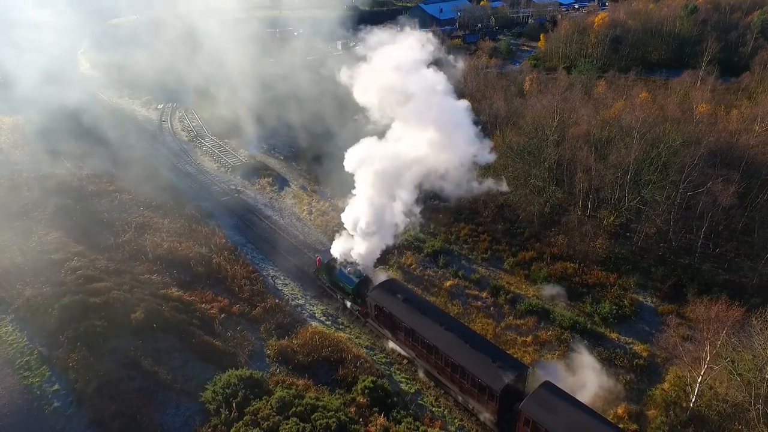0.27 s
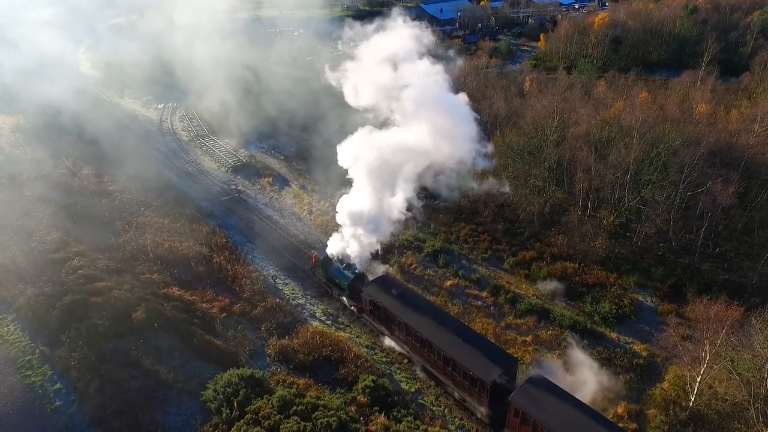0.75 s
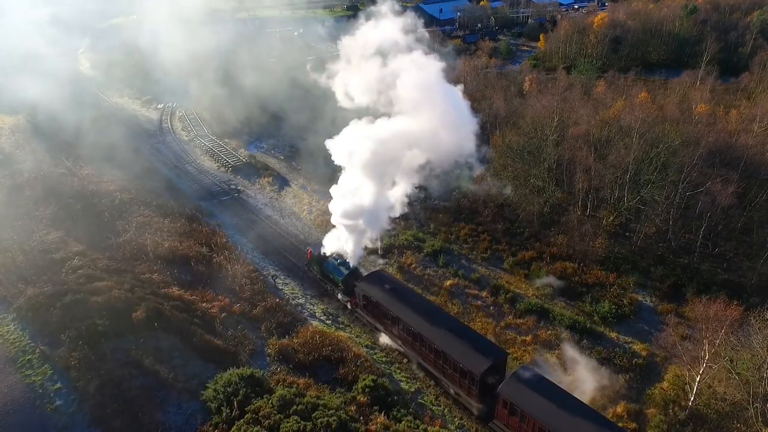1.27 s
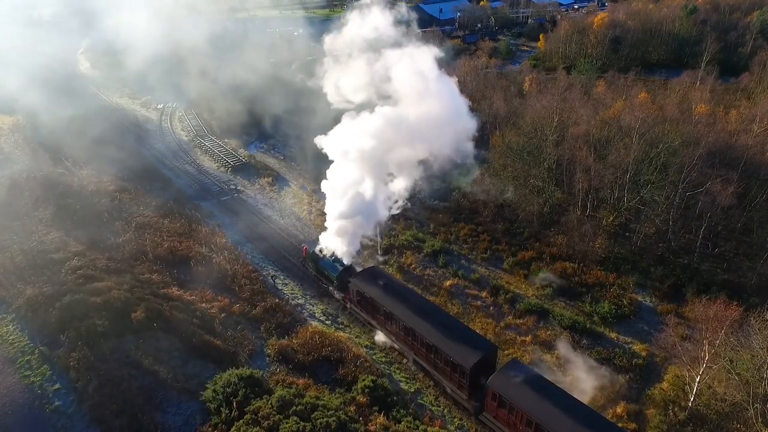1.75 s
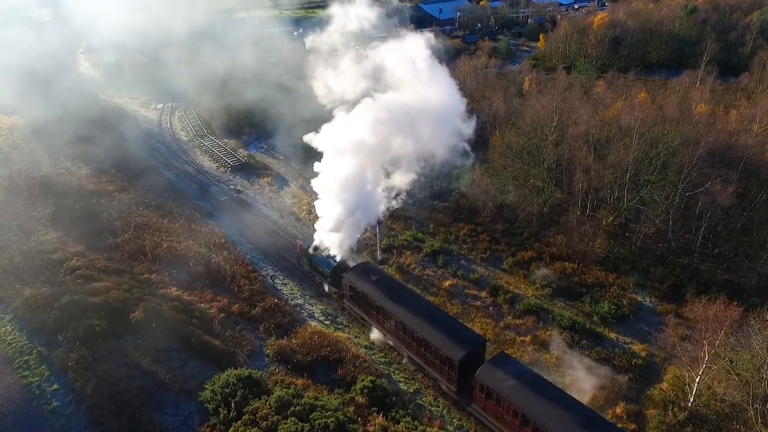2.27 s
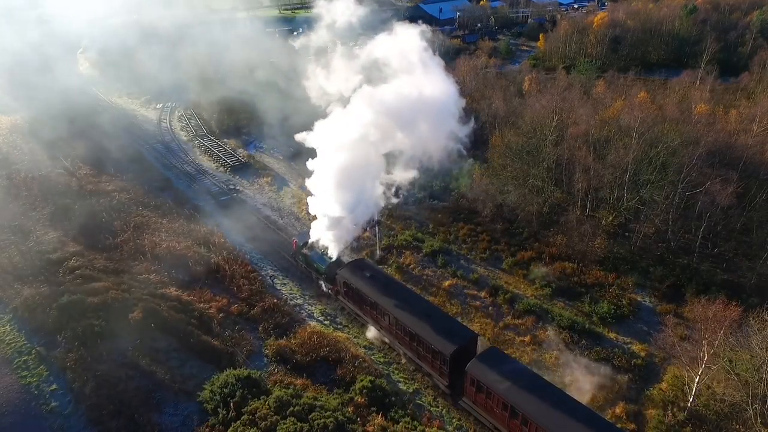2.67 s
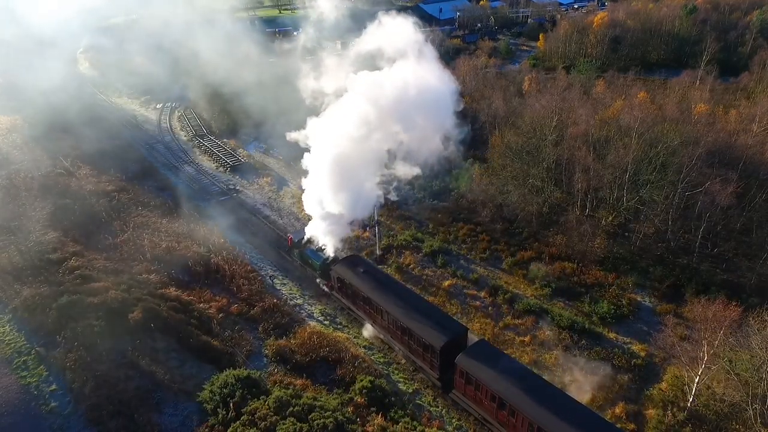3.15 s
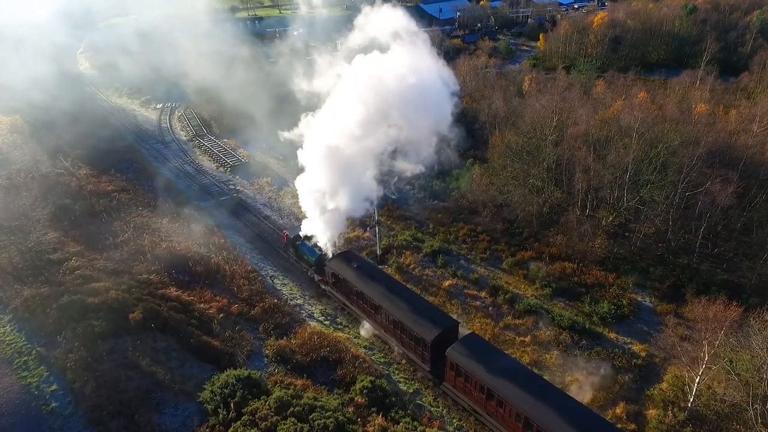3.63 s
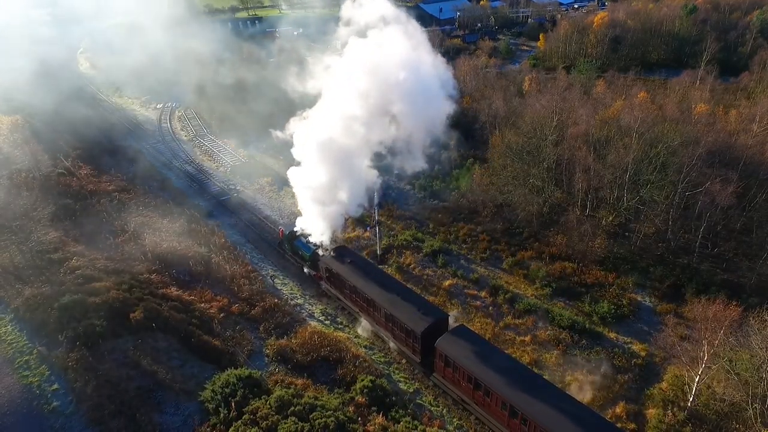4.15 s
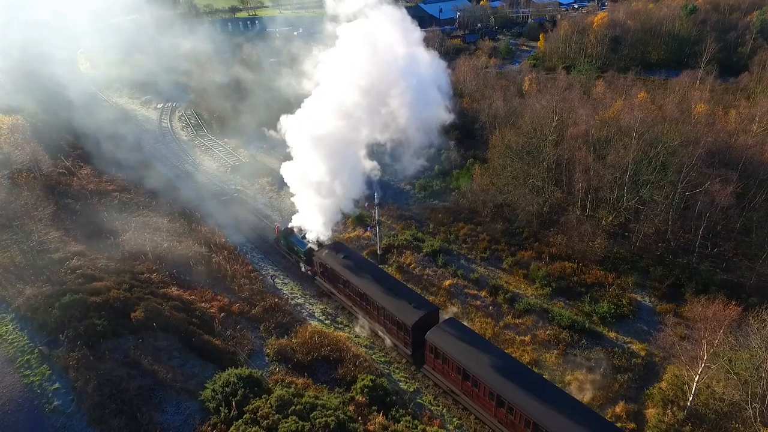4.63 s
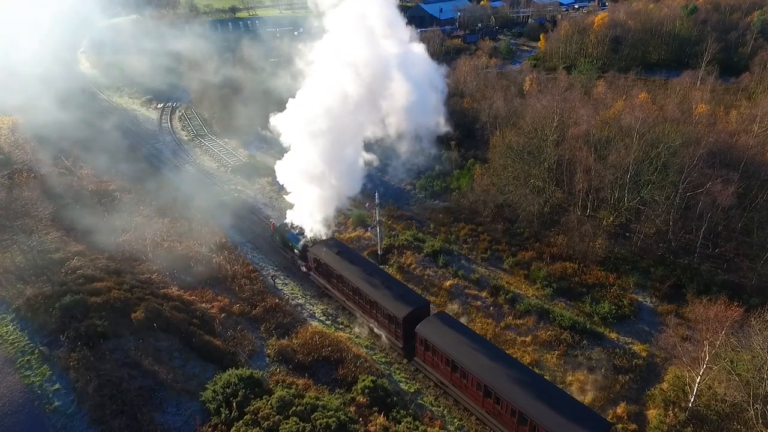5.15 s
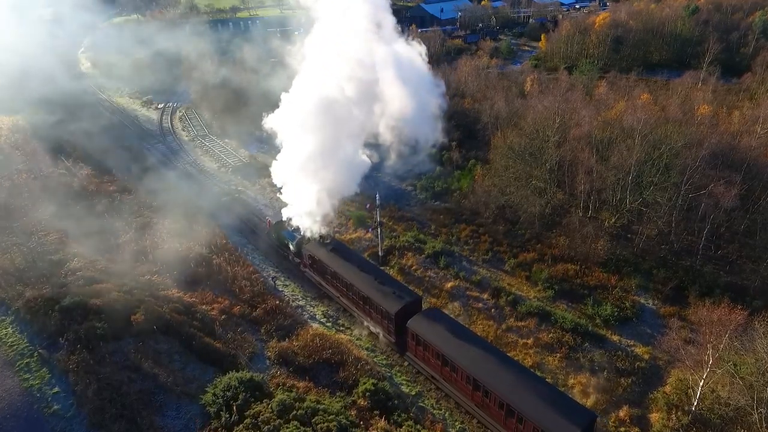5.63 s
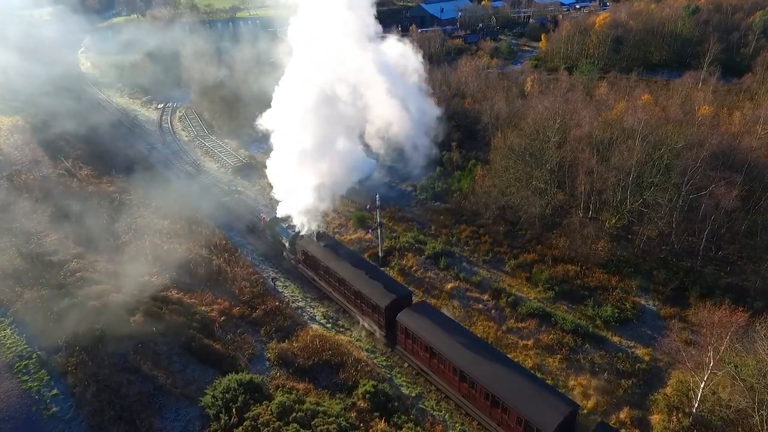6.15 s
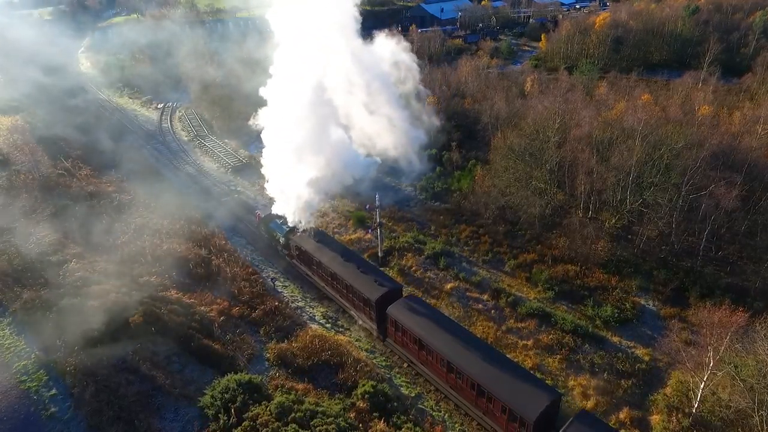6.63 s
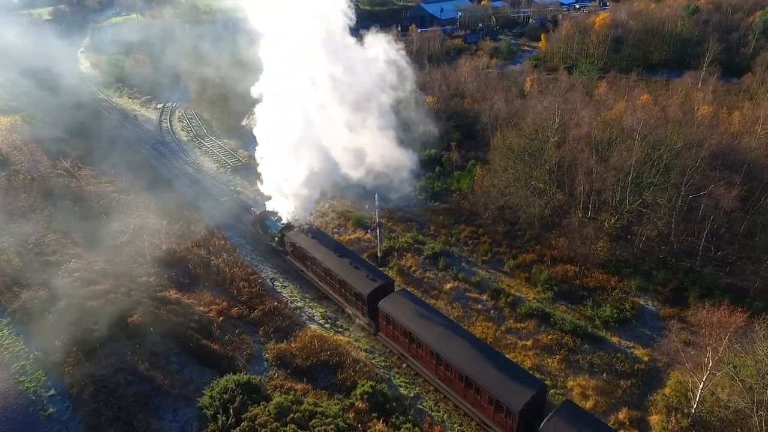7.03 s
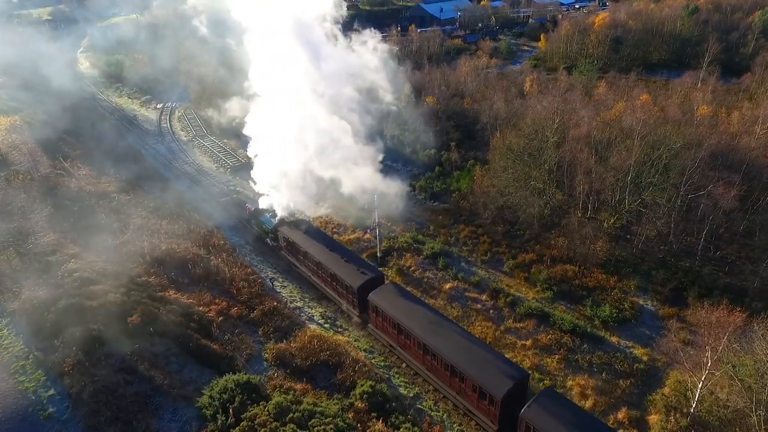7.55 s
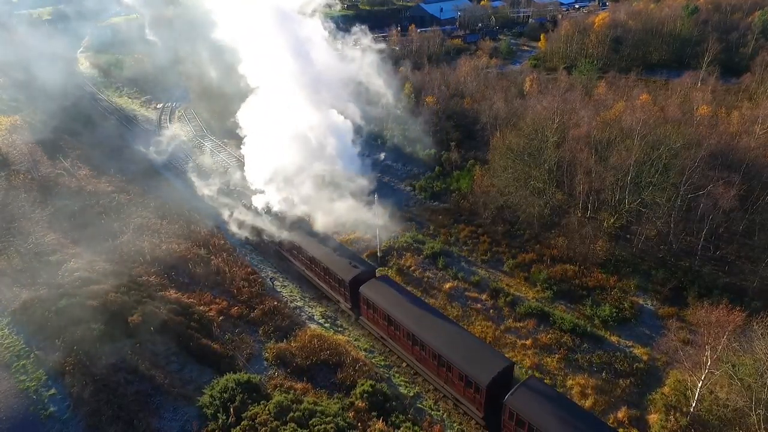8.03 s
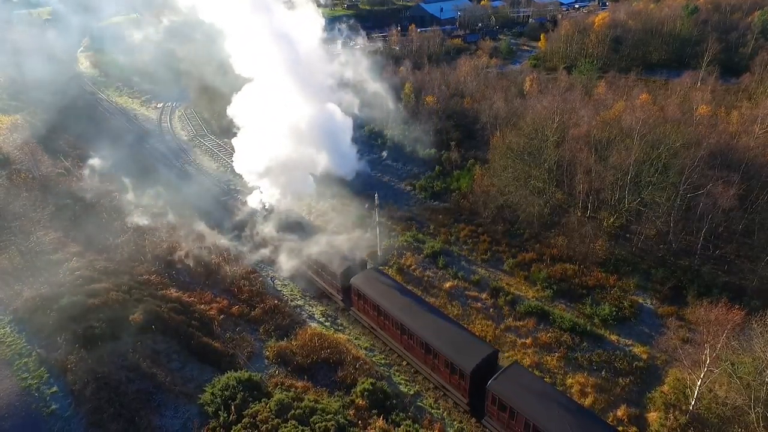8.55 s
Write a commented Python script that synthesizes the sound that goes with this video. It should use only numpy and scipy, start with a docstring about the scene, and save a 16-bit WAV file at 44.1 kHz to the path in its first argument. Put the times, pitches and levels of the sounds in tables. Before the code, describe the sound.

A steam locomotive chuffs at a distance, heavy hollow exhaust beats quickening then softening over a constant bright steam hiss and low rumble.

```python
"""A steam locomotive works a train across open country, heard from some way off.
Each exhaust beat is a burst of turbulence: two chimney tones, a roar with a bark in it and a soft spray.
A low sine thump, falling in pitch, follows most beats; dull knocks of band-limited noise fall around them.
Leaking steam is bright noise with two flickering whistles, and low noise rumbles from the wheels.
Faint steady noise has opposite polarity at the two ears, and each blast returns as a short dull wash."""
import sys
import numpy as np
from scipy import signal
from scipy.fft import rfft, irfft
from scipy.io import wavfile
from scipy.ndimage import uniform_filter1d

SR = 44100
rng = np.random.default_rng(int(sys.argv[2]) if len(sys.argv) > 2 else 0)


def transcribe(signal):
    """Save signal, clipped to [-1, 1], as a 16-bit WAV file at the path in sys.argv[1]."""
    frames = np.atleast_2d(signal).T
    limited = np.clip(frames, -1, 1)
    pcm = np.round(limited * 32767).astype(np.int16)
    wavfile.write(sys.argv[1], SR, pcm)


N = 387638


def from_db(db):
    """Gain of a level in dB."""
    return 10 ** (np.asarray(db) / 20)


def rms_one(x):
    """Scale to rms 1."""
    return x / np.sqrt(np.mean(x ** 2) + 1e-20)


def in_time(rows):
    """Columns of a curve table (time first), interpolated to one value per sample."""
    s, *columns = np.transpose(rows)
    t = np.arange(N) / SR
    return [np.interp(t, s, column) for column in columns]


def coloured(spectrum):
    """Noise with the given spectrum, rms 1; levels run straight over log frequency."""
    hz, db = np.transpose(spectrum)
    grid = np.maximum(np.fft.rfftfreq(N, 1 / SR), 1)
    grid_db = np.interp(np.log(grid), np.log(hz), db)
    white = rng.standard_normal(N)
    return rms_one(irfft(rfft(white) * from_db(grid_db), N))


def passed(x, edge, kind):
    """One reach of the spectrum, filtered both ways so that it is not delayed."""
    sos = signal.butter(2, edge, kind, fs=SR, output="sos")
    return signal.sosfiltfilt(sos, x)


def evened(x, over_s):
    """Steady the level over the given time, so that the envelope sets the loudness."""
    size = max(int(over_s * SR), 1)
    power = uniform_filter1d(uniform_filter1d(x ** 2, size=size), size=size)
    return rms_one(x / np.sqrt(power + 1e-3))


def patchy(x, depth_db, span_s, span_hz, swells=()):
    """Patches of the spectrum swell and sink at random, as moving air and drifting steam make them."""
    swell_rise = .03  # octaves per s
    hz, s, z = signal.stft(x, SR, nperseg=1024)
    field = rng.standard_normal(z.shape)
    # smooth the random field twice along frequency, then twice along time
    for axis, step, span in ((0, hz[1], span_hz), (1, s[1] - s[0], span_s)):
        for _ in range(2):
            field = uniform_filter1d(field, size=max(int(span / step), 1), axis=axis, mode="wrap")
    gain_db = depth_db * rms_one(field)
    for at, half, centre, width, db in swells:
        track = centre * 2 ** (swell_rise * (s - at))
        in_span = ((s - at) / half) ** 2
        in_band = ((hz[:, None] - track) / width) ** 2
        gain_db += db * np.exp(-.5 * in_span - .5 * in_band)
    return signal.istft(z * from_db(gain_db), SR, nperseg=1024)[1][:N]


def steam():
    """Smooth bright hiss with two flickering whistles; its reaches come and go with the drifting cloud."""
    # leaking steam: t/s, then rms level/dB of low hiss, whistle, lower whistle, middle, treble and top hiss
    leak = [(0, -40, -47, -48, -51, -51.5, -57.5), (1.05, -40, -47.5, -50, -50.5, -54, -57.5),
            (2.1, -39.5, -52, -56, -48, -52, -56.5), (2.5, -40, -42.5, -44.5, -46.5, -53.5, -58.5),
            (3.2, -40, -44, -46, -45.5, -53, -56), (4.5, -42.5, -45, -48.5, -43, -55, -57.5),
            (5.15, -42.5, -48, -51, -46.5, -53, -58), (5.7, -43.5, -42.5, -48, -46.5, -52.5, -57),
            (7.1, -43, -42.5, -45, -48, -50.5, -58.5), (7.65, -41, -43, -48, -47, -52, -60.5),
            (8.3, -41.5, -42, -49, -44.5, -51, -59), (8.79, -39, -44, -48, -46, -53.5, -63)]
    # colour of the escaping steam: f/Hz, relative level per Hz/dB
    hiss_colour = [(530, -6), (900, -2.5), (1160, -0.5), (1340, 6), (1520, 4), (1710, 5), (1910, 2),
                   (2200, 0), (2480, -6.5), (3540, -15), (5190, -29.5), (9310, -31), (15500, -39.5)]
    # stretches of hiss that swell: centre t/s, half length/s, centre f/Hz, half width/Hz, gain/dB
    hiss_swells = [(.2, 0.14, 9300, 300, 4), (2.1, .44, 13600, 500, 6), (2.2, 0.34, 9000, 300, 2.5),
                   (0.31, 1, 3760, 250, 5), (3.14, 0.33, 4800, 250, 8), (3.4, 0.28, 8793, 330, 4),
                   (4.2, 0.46, 7270, 300, 7), (4.4, 0.65, 11000, 400, 6), (4.6, 0.22, 5700, 210, 6),
                   (4.42, 0.38, 8600, 320, 9), (5.0, 0.64, 4820, 250, 9), (7, 0.99, 3310, 210, 6),
                   (7.13, 0.68, 3700, 190, 7.5), (8.23, 0.67, 6050, 230, 9), (3.76, 0.73, 3220, 51, 3.5),
                   (8.7, 0.35, 3630, 110, 5), (3.12, 0.18, 2750, 140, 6)]
    # edges of the whistling band and of the fainter one below: f/Hz
    whistle_edges = [2076, 2284]
    lower_edges = [1646, 1773]
    low_db, whistle_db, lower_db, *upper_db = in_time(leak)

    hiss = patchy(coloured(hiss_colour), depth_db=1.6, span_s=.35, span_hz=170, swells=hiss_swells)
    reaches = ((2450, "low"), ([2450, 4200], "band"), ([4200, 7000], "band"), (7000, "high"))  # Hz
    low, middle, treble, top = (from_db(db) * rms_one(passed(hiss, *reach))
                                for db, reach in zip([low_db, *upper_db], reaches))

    whistle = passed(rng.standard_normal(N), whistle_edges, "band")
    whistle = patchy(whistle, depth_db=1.5, span_s=.06, span_hz=150)
    lower = passed(rng.standard_normal(N), lower_edges, "band")
    lower = patchy(lower, depth_db=3.0, span_s=.1, span_hz=150)
    whistles = from_db(whistle_db) * rms_one(whistle) + from_db(lower_db) * rms_one(lower)
    return low + middle + whistles, treble + top


def wheel_rumble():
    """Low patchy noise of the wheels, louder as the train gathers speed."""
    # colour of the rumble: f/Hz, relative level per Hz/dB
    rumble_colour = [(18, -43), (30, -15), (59, -7.5), (113, -5), (194, -3.5), (361, -5.5), (593, -9),
                     (1100, -16), (1430, -39), (2420, -120)]
    start_db, grows = -41, 0.3367  # dB, dB per s
    level_db = start_db + grows * np.arange(N) / SR
    return from_db(level_db) * patchy(coloured(rumble_colour), depth_db=2.5, span_s=.08, span_hz=294)


def opposed_noise():
    """Faint steady noise with humming bands, in opposite polarity at the two ears."""
    # colour of this noise: f/Hz, relative level per Hz/dB
    opposed_colour = [(24, -49), (40, -21), (166, -11), (407, -13.5), (540, -3.5), (600, -8), (700, -2),
                      (800, -13), (1310, -14), (1500, -22), (1770, -4), (1950, -10), (2200, -12),
                      (4800, -22), (8520, -26.5), (15500, -40.5)]
    level_db = -49
    noise = from_db(level_db) * patchy(coloured(opposed_colour), depth_db=0.5, span_s=0.3, span_hz=300)
    return noise * np.array([[1], [-1]])


def thumps():
    """A soft bell-shaped swell of a low sine that sags in pitch."""
    # thumps: centre t/s, rms level at the centre/dB
    thump_rows = [(.04, -44), (.593, -47), (1.028, -41.5), (1.527, -44), (1.996, -40), (2.387, -43),
                  (2.511, -42.5), (3.324, -42), (3.742, -36.5), (4.169, -37), (4.564, -44), (4.958, -38),
                  (5.368, -43), (5.708, -40), (6.118, -41), (6.446, -40.5), (6.809, -39), (7.18, -41.5),
                  (7.912, -39), (8.2, -44), (8.377, -45)]
    centre_hz, fall, half_s = 55.3, 39, 0.075  # Hz at the centre, Hz per s, s
    t, out = np.arange(N) / SR, np.zeros(N)
    start_turns = rng.random((len(thump_rows), 1))
    for (at, db), start in zip(thump_rows, start_turns):
        near = slice(max(int((at - .3) * SR), 0), int((at + .3) * SR))
        s = t[near] - at
        turns = centre_hz * s - fall * s ** 2 / 2 + start
        swell = np.exp(-.5 * (s / half_s) ** 2)
        out[near] += np.sqrt(2) * from_db(db) * swell * np.sin(2 * np.pi * turns)
    return out


def knocks():
    """Dull knocks and puffs: noise bursts about an octave wide, quick to rise, dying over their length."""
    # knocks: t/s, rms level before the burst's envelope/dB, centre f/Hz, length/s
    knock_rows = [(0.112, -28, 262, 0.018), (0.189, -23, 271, 0.02), (0.547, -30.5, 253, 0.027),
                  (1.153, -25, 139, 0.013), (1.176, -31, 412, 0.031), (1.505, -29, 493, 0.032),
                  (6.425, -28, 530, .06), (7.288, -31.5, 594, 0.041), (7.81, -33.5, 600, .05)]
    out = np.zeros(N)
    for at, db, hz, length in knock_rows:
        s = np.arange(int(4 * length * SR)) / SR
        white = rng.standard_normal(12000)
        sos = signal.butter(2, [hz / 1.55, hz * 1.37], "band", fs=SR, output="sos")
        band = rms_one(signal.sosfilt(sos, white))
        envelope = (1 - np.exp(-s / 0.0045)) * np.exp(-(s / length) ** 2)
        burst = evened(band, 0.017)[-len(s):] * envelope
        i = round(at * SR)
        out[i:i + len(s)] += from_db(db) * burst
    return out


def wavering(hz, width):
    """A tone on a moving pitch whose height and phase wander as noise in a resonance does, rms 1."""
    r = np.exp(-np.pi * width / SR)
    a, b = signal.lfilter([1], [1, -2 * r, r * r], rng.standard_normal((2, N)))
    turns = np.cumsum(hz + np.zeros(N)) / SR
    return rms_one(np.real((a + 1j * b) * np.exp(2j * np.pi * turns)))


def blast(start, length, sag_db, peak_after, opened_db):
    """Level in dB of one part of every beat: the valve opens fast, the part peaks, sags and shuts."""
    shut_db, opening_s, closing_s = -33, 0.015, .05
    opening_share = 0.15  # a part that peaks later also opens more slowly, by this share of its delay
    rows = []
    for at, open_s, db, after in zip(start, length, sag_db, peak_after):
        after = np.clip(after, .03, open_s - .002)
        opening = min(opening_s + opening_share * after, after - .002)
        shape = [(0, shut_db), (opening, opened_db), (after, 0), (open_s, db), (open_s + closing_s, shut_db)]
        rows += [(at + s, level) for s, level in shape]
    return in_time(rows)[0]


def exhaust():
    """Turbulence of each blast drives two chimney tones, a roar with a bark at its core and a softer spray."""
    # exhaust beats: start t/s, valve open for/s, sag before it shuts/dB,
    #   lowest tone: peak after/s, peak level/dB; second tone: after/s, level/dB; roar: after/s, level/dB;
    #   upper roar over its usual share/dB, lowest tone f/Hz, bark f/Hz
    beats = [(0.354, 0.14, -19, 0.087, -17, 0.13, -27, 0.08, -14, -4.5, 199.5, 350),
             (0.823, 0.18, -14.5, 0.058, -16.5, 0.057, -21, 0.068, -20, 0.5, 209.4, 345),
             (1.336, 0.19, -23, 0.1, -16.5, 0.09, -13.5, 0.064, -16, 0, 209.6, 420),
             (1.796, 0.14, -12, 0.1, -20, 0.026, -21, 0.058, -20.0, 1.5, 194.4, 366),
             (2.254, 0.14, -16.5, 0.083, -14, 0.04, -21.5, 0.074, -16, -2, 198, 409),
             (2.665, 0.15, -11, 0.058, -20.0, 0.056, -21, 0.092, -17.5, -1, 188, 339),
             (3.129, 0.21, -20, 0.086, -18, 0.042, -22, 0.086, -17.5, 0.5, 185.7, 382),
             (3.539, 0.15, -17, 0.11, -21.5, 0.098, -22.5, 0.078, -18, -2, 189.9, 409),
             (3.972, 0.14, -15, 0.043, -15.5, 0.066, -27, 0.042, -11.5, -9, 214, 380),
             (4.347, 0.16, -16, 0.026, -17.5, 0.082, -27, 0.065, -16.5, -1.5, 218, 479),
             (4.765, 0.2, -18.5, 0.048, -15.5, 0.088, -25, 0.065, -16, -1.5, 208, 479),
             (5.152, 0.16, -21, 0.058, -14.5, 0.051, -26, 0.045, -17.5, -1.5, 203, 388),
             (5.538, 0.15, -18.5, 0.069, -18, 0.057, -20.5, 0.062, -15.5, -3.5, 199, 425),
             (5.888, 0.14, -17, 0.092, -15.5, 0.11, -19.5, 0.074, -17.5, -3.5, 205.4, 490),
             (6.273, 0.202, -21, 0.12, -23, 0.05, -19, 0.064, -19, 0, 190.2, 415),
             (6.623, 0.14, -14.5, 0.09, -19.5, 0.089, -22.0, 0.074, -18.5, -4.5, 194.7, 361),
             (6.985, 0.12, -7, 0.087, -20, 0.041, -16.5, 0.054, -23, 5.5, 194.9, 431),
             (7.317, 0.14, -17, 0.11, -20, 0.087, -18.5, 0.06, -24.5, 7.5, 210, 500),
             (7.675, 0.16, -17.5, 0.1, -23.0, 0.082, -19.5, 0.083, -21, 4, 205, 470),
             (8.019, 0.11, -10.5, 0.1, -23.5, 0.058, -20, 0.057, -19.5, 0, 214.9, 540),
             (8.351, 0.19, -25, 0.106, -22.5, 0.081, -20.5, 0.075, -21.5, 1.5, 199.5, 420),
             (8.668, 0.11, -10, 0.09, -23, 0.057, -24, 0.082, -22.5, 3.5, 208, 334)]
    # colours of the roar and of the spray: f/Hz, relative level per Hz/dB
    roar_colour = [(60, -29), (120, -10.5), (250, -0.5), (340, 5), (385, 3), (425, 2), (475, 1.5),
                   (560, -6.5), (700, -7), (1000, -21.5), (2000, -57), (15000, -90)]
    spray_colour = [(600, -30), (900, 1), (1200, -0.5), (2000, -7), (3500, -17.5), (6000, -28),
                    (15000, -46)]
    opened_db = -6.5  # the valve opens fast to this far under the peak
    second_swing, roar_swing = 1.11, 1.055  # these swell and sag more steeply than the lowest tone
    upper_sharp = 0.43  # the upper roar gains this share of the roar's swell on top
    spray_follows = 0.62  # share of the upper roar's colour that the spray takes on

    start, length, sag_db, low_s, low_db, second_s, second_db, roar_s, roar_db, *colour = np.transpose(beats)
    # each beat holds its own levels and pitches while its valve is open
    held = []
    for at, open_s, *row in zip(start, length, low_db, second_db, roar_db, *colour):
        held += [(at, *row), (at + open_s, *row)]
    low_db, second_db, roar_db, upper_db, low_hz, bark_hz = in_time(held)
    low_flow = blast(start, length, sag_db, low_s, opened_db)
    second_flow = second_swing * blast(start, length, sag_db, second_s, opened_db)
    roar_flow = roar_swing * blast(start, length, sag_db, roar_s, opened_db)

    low = evened(wavering(low_hz, width=29.8), 0.03)
    second = evened(wavering(275, width=34), 0.017)
    bark = from_db(-6) * wavering(bark_hz, width=42)
    roar = evened(coloured(roar_colour) + bark, 0.014)

    spray_db = -16 + spray_follows * upper_db  # relative to the roar
    upper_db = upper_db + upper_sharp * (roar_flow - opened_db)
    roar = roar + (from_db(upper_db) - 1) * passed(roar, 515, "high")
    body = from_db(low_db + low_flow) * low
    body += from_db(second_db + second_flow) * second
    body += from_db(roar_db + roar_flow) * roar
    # a narrow gap in the spectrum between the two tones
    gap_hz, gap_width_hz = 242, 13.6
    gap = signal.iirnotch(gap_hz, gap_hz / gap_width_hz, fs=SR)
    spray_flow = uniform_filter1d(from_db(roar_db + roar_flow + spray_db), size=SR // 30)
    return signal.lfilter(*gap, body) + spray_flow * coloured(spray_colour)


def echoes(x):
    """Trees and banks scatter each blast back as a dull dying wash, slightly different at each ear."""
    level_db, t60_s = -21.5, 0.29
    s = np.arange(int(.7 * SR)) / SR
    wash = rng.standard_normal((2, len(s))) * from_db(-60 * s / t60_s) * (s > .03)
    wash = wash / np.sqrt(np.sum(wash ** 2, axis=1, keepdims=True))
    mid, side = signal.fftconvolve(x[None], wash, axes=1)[:, :N]
    return from_db(level_db) * (mid + 0.16 * side * np.array([[1], [-1]]))


def scene():
    """The engine sits a little to the right and drifts towards the centre."""
    pan_db = -1.8 + .145 * np.arange(N) / SR  # left minus right
    sides_db = np.array([pan_db, -pan_db]) / 2
    treble_pan_share = .3  # the treble hiss spreads from the whole cloud, nearer the centre
    hiss, treble = steam()
    rumble = wheel_rumble()
    blasts = knocks() + exhaust()
    engine = (blasts + rumble + hiss) * from_db(sides_db)
    engine += treble * from_db(treble_pan_share * sides_db)
    return engine + thumps() + echoes(blasts) + opposed_noise()


def record(dry):
    """A steep low-pass cuts the top."""
    cutoff_hz = 15710
    return signal.sosfilt(signal.ellip(12, .3, 70, cutoff_hz, fs=SR, output="sos"), dry)


dry = scene()
out = record(dry)
transcribe(out)
```